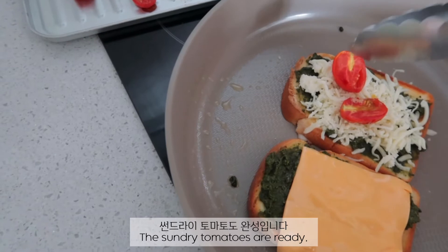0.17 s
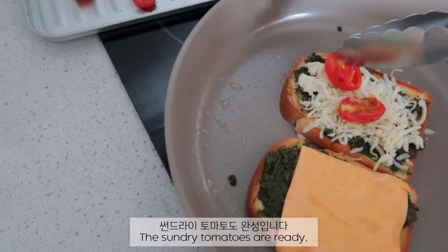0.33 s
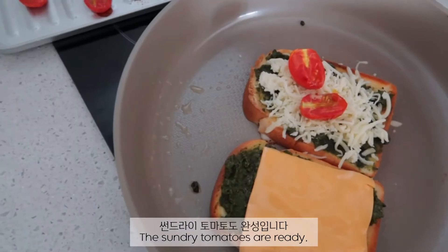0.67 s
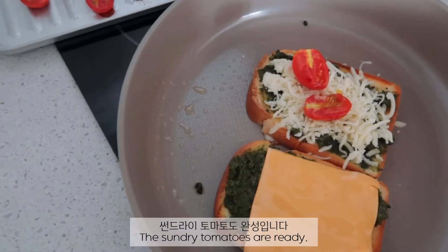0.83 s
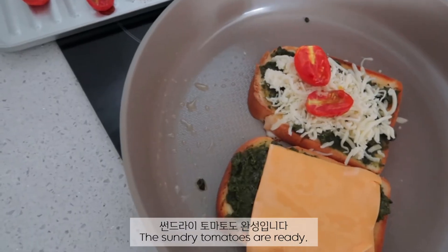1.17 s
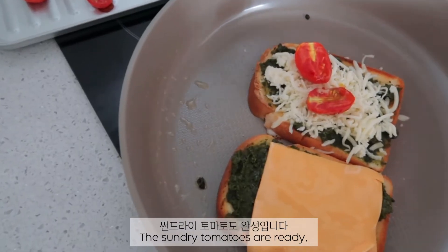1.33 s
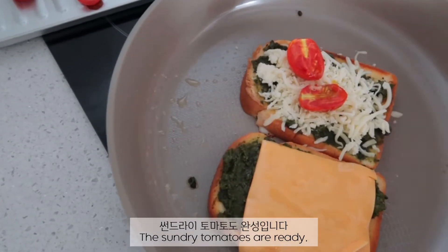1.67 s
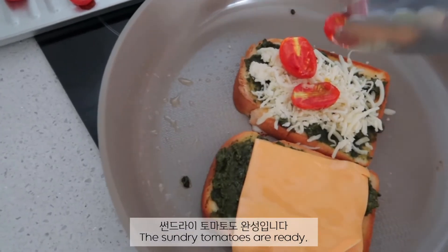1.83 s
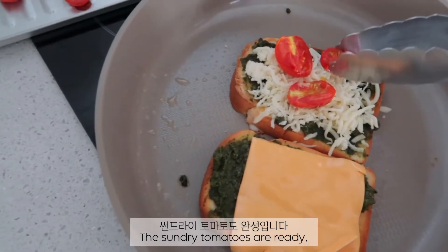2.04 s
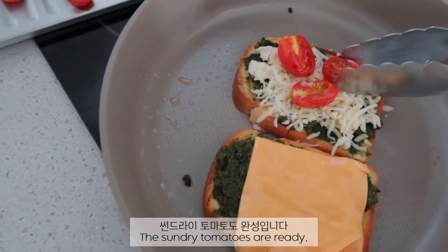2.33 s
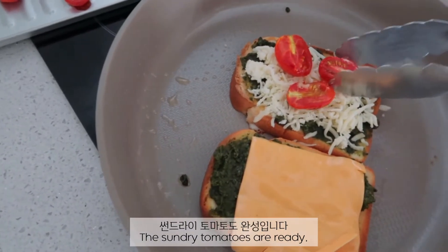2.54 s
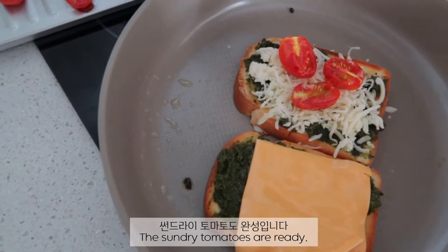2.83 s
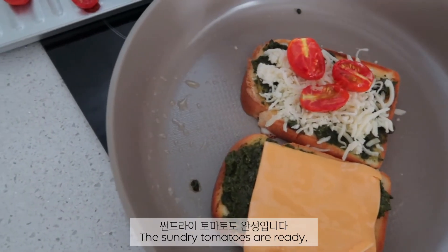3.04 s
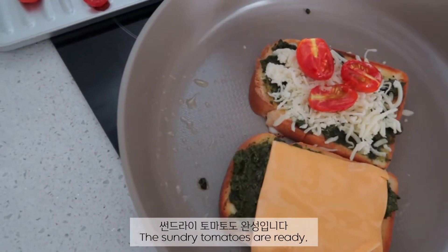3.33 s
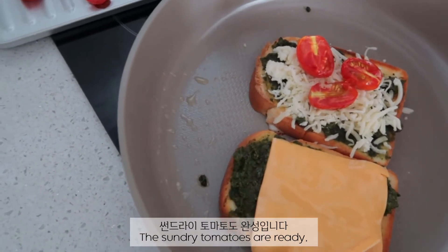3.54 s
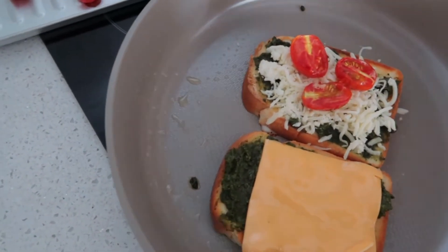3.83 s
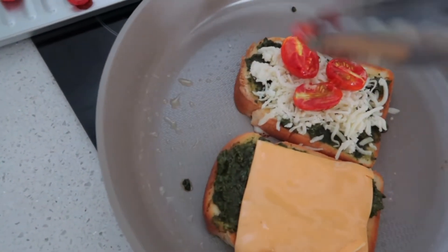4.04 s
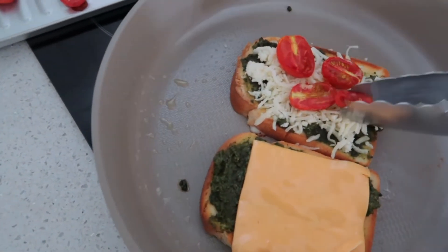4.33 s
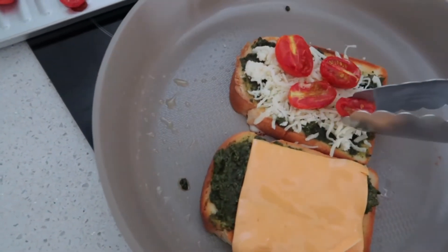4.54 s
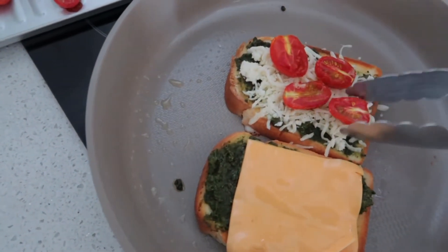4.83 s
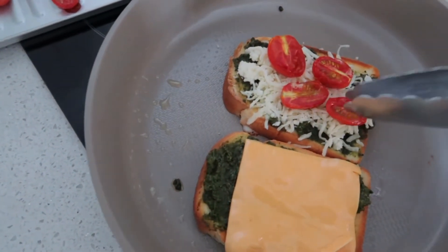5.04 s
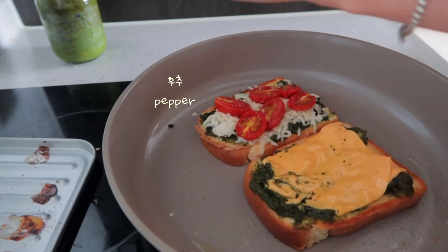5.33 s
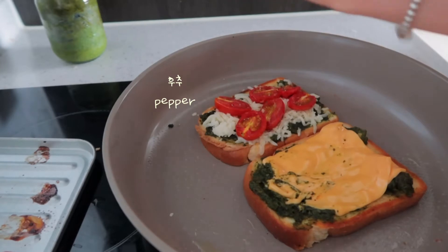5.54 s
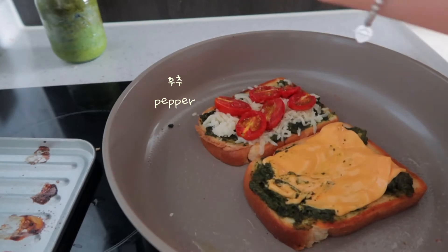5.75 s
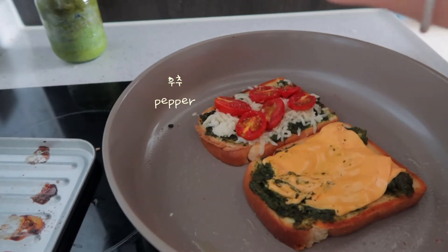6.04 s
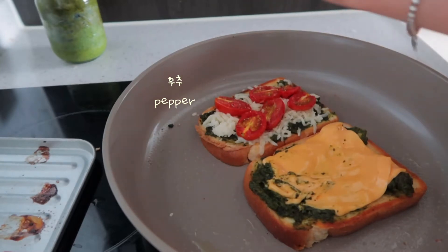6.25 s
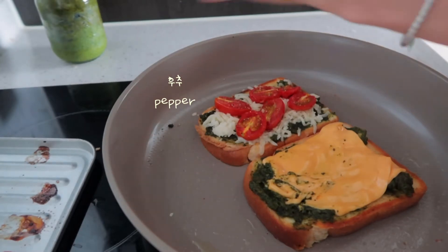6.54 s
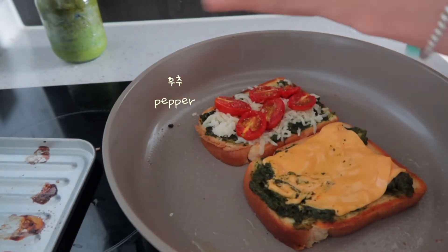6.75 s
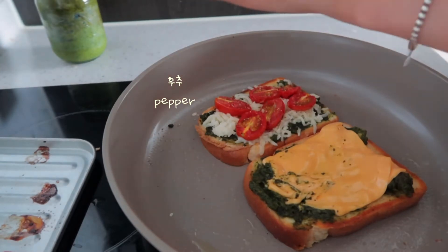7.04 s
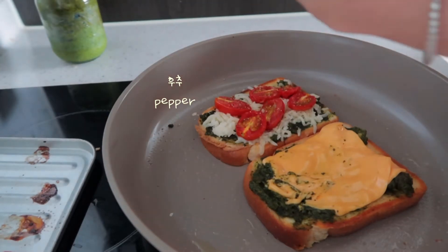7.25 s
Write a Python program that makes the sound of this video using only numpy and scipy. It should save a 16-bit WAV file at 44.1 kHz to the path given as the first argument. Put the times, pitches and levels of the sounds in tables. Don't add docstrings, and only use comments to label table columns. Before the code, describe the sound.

Close, dry kitchen sound. A soft tray thud is followed by a sharp metallic clatter of tongs and barely audible brushes. Only low fridge hum and faint hiss remain until a second, looser tong rattle. Then the scene cuts to a pepper grinder twisted to and fro, with crisp clusters of clicks and gritty crunching alternating between brighter outward strokes and duller, woodier return strokes.

```python
import sys
import numpy as np
from scipy import signal
from scipy.fft import rfft, irfft, next_fast_len
from scipy.io import wavfile

SR = 44100
rng = np.random.default_rng(int(sys.argv[2]) if len(sys.argv) > 2 else 0)


def generate_wav(signal):
    frames = np.transpose(np.atleast_2d(signal))
    scaled = np.clip(frames, -1, 1) * 32767
    pcm = np.round(scaled).astype(np.int16)
    wavfile.write(sys.argv[1], SR, pcm)


def convert_level_to_amplitude(level_db):
    exponent = np.asarray(level_db, float) / 20
    return 10 ** exponent


N = 325899

# start_s, hum_phase_before_cycles, hum_phase_after_cycles
SCENE_CHANGES = [
    (.3925, 1.04, .72),
    (2.6157, .33, .0),
    (5.1258, .58, .26),
]
# centre_hz, width_hz, level_db
FAN_WHIRS = [(58.9, 12, -63), (115.2, 10, -54), (170.3, 12, -54), (33, 14, -59)]
# frequency_hz, density_db
AIR_SPECTRUM = [(15, -33), (33, -9), (48, -29), (85, -12), (177, -20.5), (247, -20.5), (483, -26.5),
                (821, -33.5), (4910, -46.5), (10700, -57), (12400, -59), (13300, -65), (14300, -54.5),
                (16000, -83)]
# frequency_hz, side_minus_mid_db
AIR_WIDTH = [(60, -37), (110, -16), (200, -4.5), (380, -2), (700, -1.5), (1290, 0.5), (2380, 0),
             (4400, -1.5), (8120, -2.5), (15000, 3)]
# frequency_hz, side_minus_mid_db
NEAR_WIDTH = [(60, -36), (110, -25), (200, -15), (380, -24), (700, -14.5), (1290, -18.5), (2380, -8),
              (4400, -1.5), (8120, 5.5), (15000, 10)]
# start_s, ring_db, thud_db, own_mode_hz, rattle_t60_s
TRAY_KNOCKS = [(0.1128, -32, -28.5, 422, 0.16), (0.8202, -5, -18.5, 2040, 0.054),
               (0.8292, -9.5, -34, 1740, 0.17), (0.903, -20.5, -41, 2880, 0.085),
               (0.9193, -19, -28, 1690, 0.16), (3.1661, -13, -29, 1630, 0.028),
               (3.176, -19, -35, 1860, 0.087), (3.204, -26, -54, 2840, 0.17),
               (3.2138, -30.5, -33, 1840, 0.056), (3.268, -26.5, -47, 1750, 0.11),
               (3.274, -24.5, -38, 1810, 0.11), (3.2843, -33, -31.5, 280, 0.077),
               (3.3098, -33, -41, 1080, 0.075)]
PLACE_CHANGES = [.5, 2.]
TIP_TICKS = [-3.5, -7, -15.5]
# pitch_hz, place_1_db, place_2_db, place_3_db, t60_s
TRAY_MODES = [(282.3, -14, -4.5, 5.5, 0.093), (335, -15, -0.5, 3.5, 0.046), (389.7, 5.5, -4.5, 5, 0.2),
              (450.5, 9, 1.5, 1, 0.045), (493, 6.5, -1, -19, 0.083), (600, 0, -2.5, -0.5, 0.033),
              (700, -4, -13.5, -3, 0.051)]
# pitch_hz, place_1_db, place_2_db, place_3_db, t60_s
TONG_MODES = [(847, -8, -12.5, -6.5, 0.025), (1065, -18, -9, -3, 0.054), (1262, -2.5, -12.5, -6.5, 0.065),
              (1400, -16, -9.5, 4.5, 0.015), (1560, -2, -1, -11, 0.016), (1715, -15, 5.5, -5, .04),
              (1800, -1, -4, 5, 0.022), (2108, -14, 2.5, -7, 0.033), (2260, -12, -12, -4.5, 0.028),
              (2450, -3, 4.5, -11, 0.015), (2714, -13, -2, 0.5, 0.024), (3010, 4, -0.5, -8.5, 0.018),
              (3300, -4, -3.5, -7, 0.015)]
# pitch_hz, place_1_db, place_2_db, place_3_db, t60_s
TIP_MODES = [(3630, -16, 0.5, 8, 0.0083), (4050, 6.5, -11, -5, 0.012), (4570, -3, -1, 4.5, 0.0083),
             (5250, -12, 0, 6.5, 0.0069), (6180, -11, 0.2, 5.5, 0.0068), (6930, -6, -3, -14, 0.0075),
             (8200, -2, -4, 4.5, 0.0024), (10040, 3, 4.5, -12, 0.00084), (10500, -10, -9, -0.5, 0.0017),
             (13300, -12, 5.5, 2, 0.000983)]
# start_s, ring_db, thud_db, tick_db
AFTER_TOUCHES = [
    (1.0544, -45, -51, -47),
    (1.1786, -41, -43, -71),
]
# start_s, burr_db, barrel_db, own_mode_hz
OUTWARD_CRACKS = [(5.3296, -10, -34, 4100), (5.3414, -25, -15.5, 4000), (5.3504, -12.5, -22, 4250),
                  (5.372, -16.5, -39, 3900), (5.3913, -17, -20, 4040), (5.4088, -20, -48, 3070),
                  (5.4514, -23, -57, 4050), (5.7293, -15, -30, 1540), (5.7494, -15.5, -16, 1590),
                  (5.756, -16, -39, 3630), (5.7748, -11, -40, 3200), (5.7883, -16.5, -39, 3300),
                  (5.811, -9, -41, 3820), (6.117, -39, -32, 4180), (6.1418, -20.5, -44, 1470),
                  (6.1525, -19, -20, 3860), (6.1804, -18, -34, 2850), (6.1928, -15.5, -42, 3750),
                  (6.2014, -16, -40, 2010), (6.2206, -23, -53, 2340), (6.5758, -9.5, -33, 3974),
                  (6.5907, -6.5, -27, 2920), (6.6109, -9.5, -16.5, 3850), (6.637, -17, -25, 2220),
                  (6.9691, -27, -15.5, 1310), (6.985, 1, -23.5, 4150), (7.02, -24, -40, 1980),
                  (7.0414, -35, -42, 1990), (7.3587, -9, -17, 3220), (7.3722, -10.5, -40, 2570)]
# start_s, burr_db, barrel_db, own_mode_hz
BACKWARD_CRACKS = [(5.155, -16.5, -19, 1560), (5.1736, -16.5, -22, 4480), (5.1884, -21, -18, 1470),
                   (5.211, -18, -23, 1590), (5.2237, -24, -12.5, 4450), (5.538, -27, -25, 4060),
                   (5.5664, -32, -17.5, 4400), (5.5802, -23, -48, 4400), (5.595, -17, -21, 1590),
                   (5.609, -13.5, -23, 1530), (5.6217, -26, -15, 4040), (5.9427, -25.5, -25, 1510),
                   (5.9713, -34, -23, 1800), (5.988, -17, -36, 1470), (6.0263, -30, -45, 1560),
                   (6.0404, -27, -34, 3890), (6.357, -27.5, -32, 1890), (6.4103, -22.5, -17, 1870),
                   (6.4244, -11, -58, 1590), (6.76, -24, -24, 1950), (6.78, -4.5, -11, 2530),
                   (6.821, -29, -22, 1930), (6.8444, -18.5, -21, 4440), (6.8636, -19.5, -39, 1530),
                   (7.151, -34, -30, 1980), (7.1782, -19, -20, 1560), (7.2, -23, -21.5, 1460),
                   (7.2321, -22.5, -30, 1520), (7.2446, -21, -19, 4300), (7.2783, -23.5, -45, 2370)]
CRUMBLE_T60 = [0.067, 0.065]
# pitch_hz, level_db, t60_s
BARREL_MODES = [(647, 6.5, 0.023), (1220, -49, 0.0081), (1470, -19, 0.078), (1590, 2, 0.0092),
                (1810, -43, 0.014), (1980, -5, 0.03), (2330, -25, 0.032)]
# pitch_hz, level_db, t60_s
BURR_MODES = [(2373, -2.5, 0.0054), (2840, -10, 0.012), (2920, -12, 0.014), (3300, -0.5, 0.0034),
              (3890, -23, 0.0017), (3860, -12, 0.018), (4050, 4, 0.0042), (4400, 2, 0.0031),
              (4820, -7.5, 0.0069)]
# pitch_hz, level_db, t60_s
HUSK_MODES = [(5050, -3, .0025), (5800, -2, .0016), (6600, 2, .002), (7500, 1, .0012), (8560, 1, .001),
              (10000, 3, .0008), (11700, 2, .0008), (13500, 2, .0008)]
# start_s, turning_s, bite_db, last_db, barrel_share_db
WRIST_STROKES = [(5.14, 0.058, -47, -39, 2), (5.333, 0.091, -27.5, -41.5, -1),
                 (5.541, 0.045, -44, -35.5, 0.5), (5.729, 0.072, -31, -37.5, -5),
                 (5.943, 0.061, -52, -39, 1.5), (6.142, 0.039, -33, -32.5, -3), (6.347, 0.077, -54, -31, 1),
                 (6.557, 0.05, -37.5, -27, -1), (6.775, 0.076, -32, -36, 1),
                 (6.961, 0.03, -35.5, -24, -9.5), (7.152, .13, -42, -45.5, 0.5),
                 (7.359, 0.052, -25, -20, -0.5)]
SLACK = [.014, .007]


def rms_one(x):
    return x / np.sqrt(np.mean(x ** 2) + 1e-20)


def coloured(x, points):
    size = next_fast_len(N)
    hz = np.maximum(np.arange(size // 2 + 1) * SR / size, 1)
    hz_points, db_points = np.transpose(points)
    gain = convert_level_to_amplitude(np.interp(np.log(hz), np.log(hz_points), db_points))
    return irfft(rfft(x, size) * gain, size)[:N]


def drift(rate_hz):
    lowpass = signal.butter(2, rate_hz, fs=SR, output="sos")
    return rms_one(signal.sosfilt(lowpass, rng.standard_normal(N + SR))[SR:])


def ring(force, hz, t60):
    r, w = convert_level_to_amplitude(-60 / (t60 * SR)), 2 * np.pi * hz / SR
    return signal.lfilter([0, np.sin(w)], [1, -2 * r * np.cos(w), r * r], force + 1e-18)


def grains(per_s, spread_db):
    sizes = convert_level_to_amplitude(spread_db * np.minimum(rng.exponential(1, N), 4))
    signs = rng.choice([-1, 1], N)
    return rms_one(sizes * signs * (rng.random(N) < per_s / SR))


def struck(hits, bodies, rattle_per_s, click_db, own_db, own_t60, trims_db, uneven_db):
    out, span = np.zeros(N), np.arange(SR // 8)
    modes = sum(bodies, [])
    body_sizes = [len(body) for body in bodies]
    start = round(hits[0][0] * SR)
    end = min(round(hits[-1][0] * SR) + SR // 2, N)
    forces = np.zeros((len(modes) + 1, end - start + len(span)))
    rattle = grains(rattle_per_s, 2.0)
    other_grains = 7919 * np.arange(len(forces))[:, None]
    uneven = rng.standard_normal((len(hits), len(modes)))
    for (s, *levels_db, hz, t60), chance in zip(hits, uneven):
        at = round(s * SR)
        decays = span / SR / max(t60, .004)
        swell = convert_level_to_amplitude(-60 * decays) * (1 - np.exp(-decays / 0.0066))
        push = swell * rattle[(at + span + other_grains) % N]
        push /= np.sqrt(np.sum(push ** 2, axis=1, keepdims=True) + 1e-9)
        push[:, 0] += convert_level_to_amplitude(click_db) * (-1) ** np.arange(len(forces))
        gains = convert_level_to_amplitude(np.repeat(np.add(levels_db, trims_db), body_sizes) + uneven_db * chance)
        forces[:-1, at - start:at - start + len(span)] += gains[:, None] * push[:-1]
        own = convert_level_to_amplitude(max(levels_db) + own_db) * ring(push[-1], hz, own_t60)
        out[at:at + len(span)] += own[:N - at]
    for force, (hz, db, t60) in zip(forces, modes):
        out[start:end] += convert_level_to_amplitude(db) * ring(force[:end - start], hz, t60)
    return out


def refrigerator():
    hum_hz, hum_db = 58.85, -39.5
    times, cycles = [0.], [0.]
    for s, before, after in SCENE_CHANGES:
        whole = round(cycles[-1] + hum_hz * (s - times[-1]) - before)
        times += [s, s + 1 / SR]
        cycles += [whole + before, whole + after]
    cycles[0] = cycles[1] - hum_hz * times[1]
    cycles.append(cycles[-1] + hum_hz * (N / SR - times[-1]))
    times.append(N / SR)
    phase = np.interp(np.arange(N) / SR, times, cycles)
    out = np.sqrt(2) * convert_level_to_amplitude(hum_db + .5 * drift(6)) * np.sin(2 * np.pi * phase)
    for hz, width_hz, db in FAN_WHIRS:
        t60 = np.log(1000) / np.pi / width_hz
        out += convert_level_to_amplitude(db) * rms_one(ring(rng.standard_normal(N + SR), hz, t60)[SR:])
    return out


def air():
    mid = coloured(rng.standard_normal(N), AIR_SPECTRUM)
    side = coloured(rng.standard_normal(N), AIR_SPECTRUM)
    above = signal.sosfilt(signal.butter(4, 200, "high", fs=SR, output="sos"), mid)
    gain = convert_level_to_amplitude(-54.5 + 0.7 * drift(3.6)) / np.std(above)
    return gain * mid, gain * coloured(side, AIR_WIDTH)


def tongs():
    out = np.zeros(N)
    places = np.searchsorted(PLACE_CHANGES, [knock[0] for knock in TRAY_KNOCKS])
    for place in range(3):
        hits = [(s, ring_db, thud_db, ring_db + TIP_TICKS[place], hz, t60)
                for (s, ring_db, thud_db, hz, t60), where in zip(TRAY_KNOCKS, places) if where == place]
        bodies = [[(hz, rest[place], rest[-1]) for hz, *rest in body]
                  for body in (TONG_MODES, TRAY_MODES, TIP_MODES)]
        out += struck(hits, bodies, rattle_per_s=2500, click_db=-5, own_db=-7.5, own_t60=0.03,
                      trims_db=[-11, -7, -6], uneven_db=1.66)
    return out


def touches():
    bodies = [[(hz, rest[2], rest[-1] / 2) for hz, *rest in body]
              for body in (TONG_MODES, TRAY_MODES, TIP_MODES)]
    hits = [(*touch, 1000, .06) for touch in AFTER_TOUCHES]
    return struck(hits, bodies, rattle_per_s=2900, click_db=-1.5, own_db=-42, own_t60=.01,
                  trims_db=[-11, -7, -6], uneven_db=4.9)


def cracks():
    snaps_db, snap_growth = (-15.5, -17), 0.93
    dull_share = 0.18
    hard_db, hard_shortens = -6, 1.4
    hits = []
    for table, snap_db, crumble_t60 in zip((OUTWARD_CRACKS, BACKWARD_CRACKS), snaps_db, CRUMBLE_T60):
        for s, burr_db, barrel_db, hz in table:
            husk_db = snap_db + snap_growth * burr_db - dull_share * (barrel_db - burr_db)
            t60 = crumble_t60 * convert_level_to_amplitude(-hard_shortens * max(burr_db - hard_db, 0))
            hits.append((s, burr_db, barrel_db, husk_db, hz, t60))
    return struck(sorted(hits), [BURR_MODES, BARREL_MODES, HUSK_MODES], rattle_per_s=4000, click_db=-6.5,
                  own_db=-5, own_t60=0.012, trims_db=[-9, -9, -2], uneven_db=2.65)


def wrist(t):
    rest_db, let_go_db_per_s = -53, 204
    barrel_damps_db_per_s = 93
    grind_db, barrel_db = np.full(len(t), float(rest_db)), np.zeros(len(t))
    for k, (s, turning_s, bite_db, last_db, share_db) in enumerate(WRIST_STROKES):
        grip = s - SLACK[k % 2]
        after = np.maximum(t - s - turning_s, 0)
        stroke_db = np.interp(t, [grip, s, s + turning_s], [rest_db, bite_db, last_db])
        grind_db = np.maximum(grind_db, stroke_db - let_go_db_per_s * after)
        barrel_db = np.where(t > grip, share_db - barrel_damps_db_per_s * after, barrel_db)
    return grind_db, barrel_db


def grinding():
    start = round(SCENE_CHANGES[-1][0] * SR)
    damping, apart = .55, 3571
    grind_db, barrel_db = wrist(np.arange(start, N) / SR)
    crumbs = grains(7000, 1.5)[start:]
    clumps = convert_level_to_amplitude(3.0 * drift(70))[start:]

    def grated(body):
        return rms_one(sum(convert_level_to_amplitude(db) * ring(clumps * np.roll(crumbs, apart * k), hz, damping * t60)
                           for k, (hz, db, t60) in enumerate(body)))

    sound = grated(BURR_MODES) + convert_level_to_amplitude(barrel_db + 5.5) * grated(BARREL_MODES) + convert_level_to_amplitude(-5.5) * grated(HUSK_MODES)
    return np.append(np.zeros(start), convert_level_to_amplitude(grind_db - 2.5) * sound)


def mill():
    band = signal.butter(4, [1330, 13300], "band", fs=SR, output="sos")
    return signal.sosfilt(band, cracks() + grinding())


def echoes(x, t60, gap_s, dull_hz):
    hands_turn_hz = 1.9
    t = np.arange(SR // 2) / SR
    tails = rng.standard_normal((2, len(t))) * convert_level_to_amplitude(-60 * t / t60) * (t >= gap_s)
    tails = signal.sosfilt(signal.butter(1, min(dull_hz, 20000), fs=SR, output="sos"), tails)
    turn = 2 * np.pi * hands_turn_hz * np.arange(N) / SR
    paths = signal.fftconvolve(x * np.array([np.cos(turn), np.sin(turn)]), tails, axes=1)
    return paths.sum(axis=0)[:N] / np.sqrt(np.sum(tails[0] ** 2))


def scene():
    room_t60, room_db, room_dull_hz = 0.23, -13.5, 6600
    near = tongs() + touches() + mill()
    counter = convert_level_to_amplitude(-10.5) * echoes(near, 0.016, 0.0012, 8000)
    walls = convert_level_to_amplitude(room_db) * echoes(near, room_t60, 0.003, room_dull_hz)
    side_counter = echoes(near, 0.038, 0, 14000)
    side_walls = convert_level_to_amplitude(room_db + 1.5) * echoes(near, room_t60, 0.0074, room_dull_hz)
    air_mid, air_side = air()
    mid = near + counter + walls + air_mid + refrigerator()
    side = convert_level_to_amplitude(-6.0) * coloured(side_counter + side_walls, NEAR_WIDTH) + 0.031 * near + air_side
    return np.array([mid + side, mid - side])


def band_limit(x):
    return signal.sosfilt(signal.butter(12, 16010, fs=SR, output="sos"), x)


def record(dry):
    microphone_top_hz, ceiling = 14400, .9
    dry = signal.sosfilt(signal.butter(8, microphone_top_hz, fs=SR, output="sos"), dry)
    mix = ceiling * np.tanh(dry / ceiling) + 0.00026
    return band_limit(mix)


dry = scene()
out = record(dry)
generate_wav(out)
```